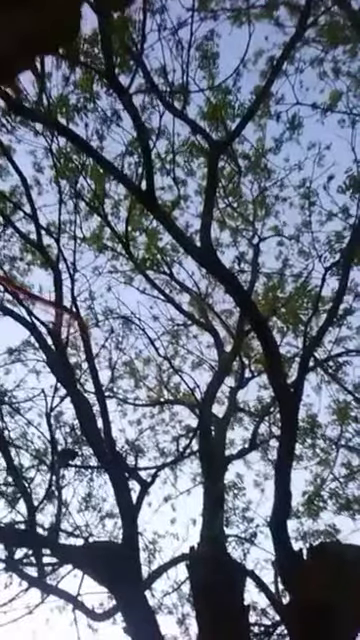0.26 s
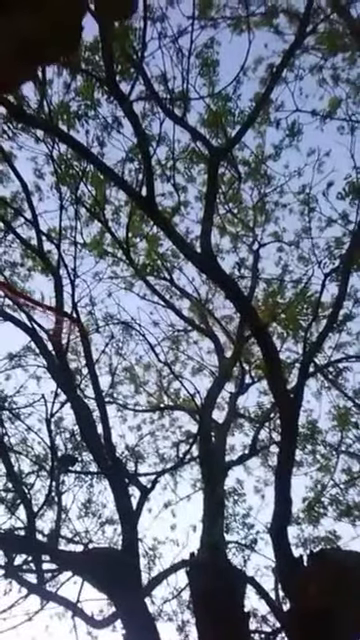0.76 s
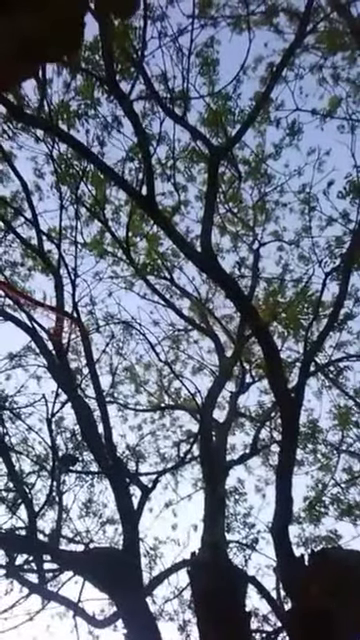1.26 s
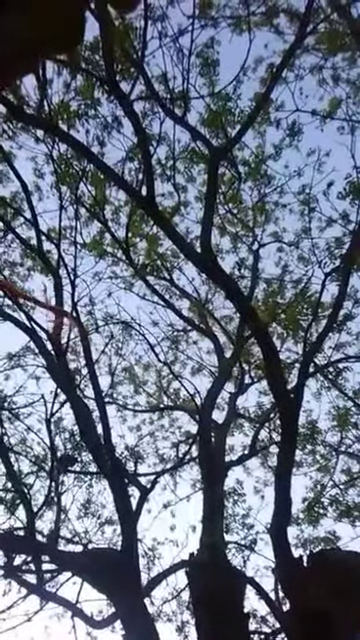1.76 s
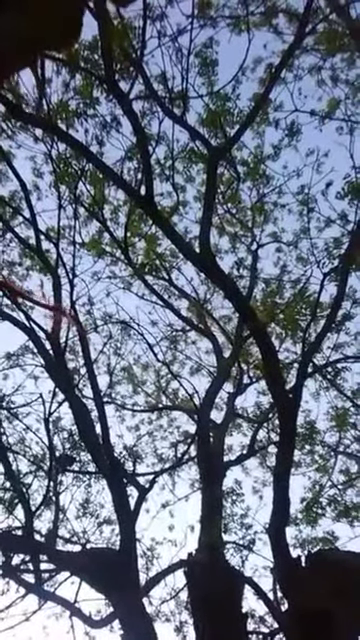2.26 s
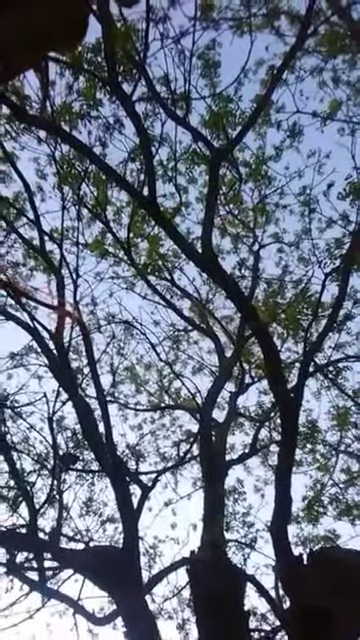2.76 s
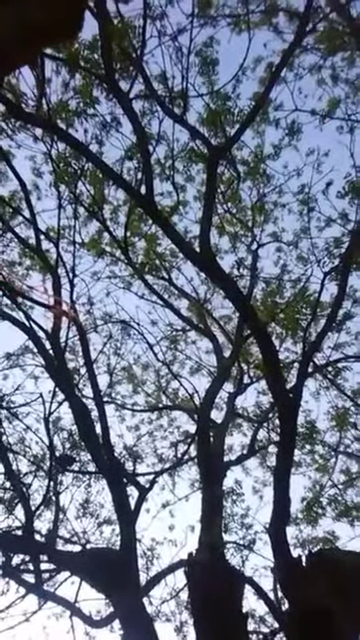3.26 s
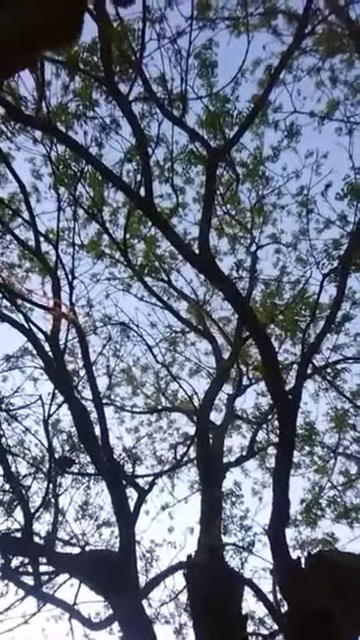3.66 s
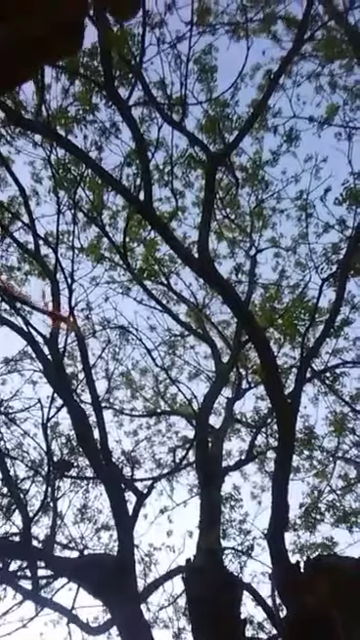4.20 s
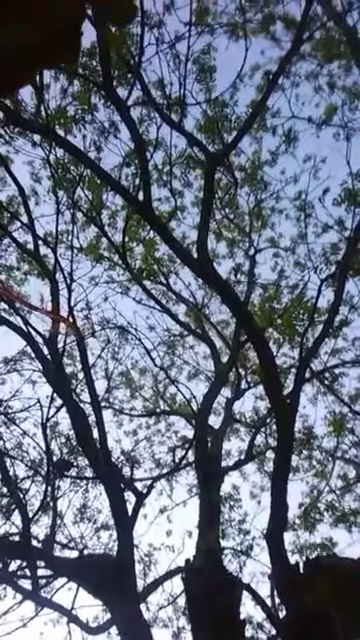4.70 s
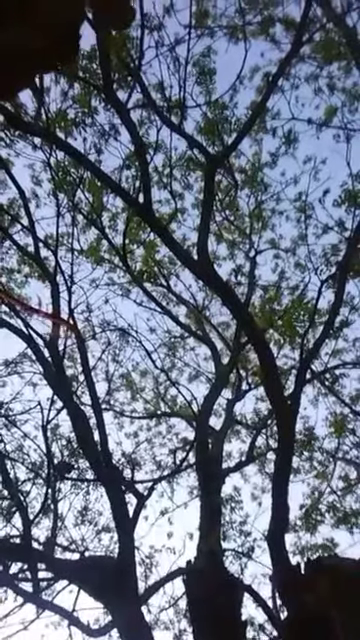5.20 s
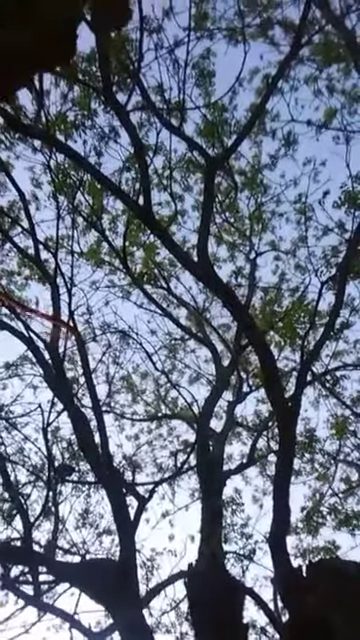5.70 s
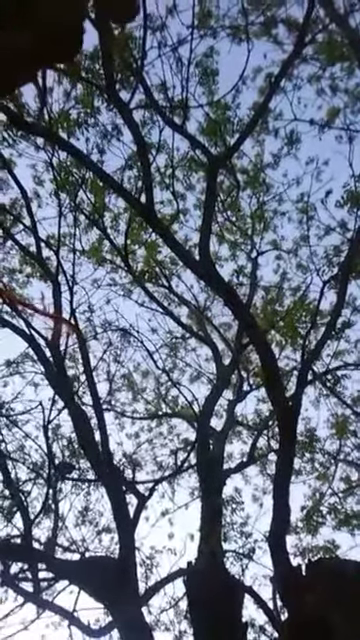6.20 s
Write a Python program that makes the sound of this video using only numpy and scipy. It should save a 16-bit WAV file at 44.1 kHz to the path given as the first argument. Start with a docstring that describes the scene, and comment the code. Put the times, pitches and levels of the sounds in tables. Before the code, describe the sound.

A soft dull knock with a brief rustle opens at 0.05 s over a quiet rush of outdoor air and the low, slightly wavering hum of an idling engine. From 0.13 s a mockingbird overhead sings: a bright upward whistle, a two-toned chord at 0.3, sharp chips at 0.65 and 0.9, thin high notes at 1.15 and 1.45. A quiet buzzy whine with fast flicks follows at 1.8-2.1, then four harsh chacks, each led by a tick, from 2.3 to 3.2. Two chups come at 3.4 and 3.6, a long descending slur at 3.9, two swoops leading into strong rising whistles at 4.5 and 5.0, rough churrs at 5.55 and 5.8, and faint piercing seeps at 6.1 and 6.4. Distant birds whistle, twitter and rasp hazily throughout. A far dog barks at 4.05 and 4.55, with lingering echo. Trees and walls scatter the song.

```python
"""A soft knock opens the scene, over a steady rush of air and the hum of an idling engine.
Then a mockingbird sings overhead to the end: whistles, chips, harsh chacks and slurs, most of them repeated.
Its two-sided voice box can sound two gliding tones at once; trunks and house walls scatter the song.
Far birds whistle, twitter and rasp meanwhile, as gliding tones, flickering noise and hazy falling calls.
After four seconds a dog barks twice far off: two bursts of noise with a long faint tail."""
import sys
import numpy as np
from scipy import signal
from scipy.fft import rfft, irfft, next_fast_len
from scipy.io import wavfile
from scipy.ndimage import map_coordinates

SR = 44100
rng = np.random.default_rng(int(sys.argv[2]) if len(sys.argv) > 2 else 0)


def generate_wav(sig):
    """Save sig (samples, or channels by samples) to the path in sys.argv[1] as 16-bit PCM at SR."""
    pcm = np.round(np.clip(np.atleast_2d(sig).T, -1, 1) * 32767).astype(np.int16)
    wavfile.write(sys.argv[1], SR, pcm)


N = 284445  # length of the scene in samples
MARGIN_S = .01  # room for a stroke to fade in and out
# Calls of the mockingbird and, named "rasp", of a far bird: t/s, syllable, level/dB, stretch in time (factor)
CALLS = [(0.134, "whee", -39, 1), (.308, "chord", -39.5, 0.97), (.639, "chip", -34, 0.91),
         (.911, "chip", -35.5, 1.05), (1.138, "tsee", -40, 1.006), (1.441, "tsee", -40.5, 1.02),
         (1.77, "whine", -50, 0.84), (1.801, "undertone", -54, 1.14), (1.882, "undertone", -52.5, 1.16),
         (1.935, "undertone", -60, .7), (1.974, "undertone", -54, 1.02), (1.768, "flick", -60, 0.79),
         (1.833, "flick", -50.5, 0.88), (1.917, "flick", -55, 0.93), (1.969, "flick", -54, 0.78),
         (2.047, "flick", -48, 1.3), (2.303, "tick", -51.5, .6), (2.333, "chack", -43.5, 0.9),
         (2.513, "tick", -50, 1.2), (2.568, "chack", -42, 0.92), (2.783, "tick", -48, 0.87),
         (2.828, "chack", -43, 0.94), (3.086, "tick", -48.5, 0.94), (3.133, "chack", -42.5, 0.87),
         (3.416, "chup", -44, 1.04), (3.632, "chup", -42.5, 1.2), (3.69, "rasp", -70, 0.97),
         (3.873, "slur", -37, 0.95), (4.467, "swoop", -44.5, 0.99), (4.618, "rise", -31.5, 1.026),
         (4.998, "swoop", -43.5, 1.01), (5.146, "rise", -32.5, 1.04), (5.545, "churr", -39.5, 0.98),
         (5.813, "churr", -41, 0.97), (5.885, "rasp", -64, 0.9), (6.086, "seet", -50.5, 1.08),
         (6.146, "rasp", -64.5, 1.1), (6.419, "seet", -50, 1)]


def amp(db):
    """Turn decibels into a gain."""
    return 10 ** (np.asarray(db) / 20)


def unit(x):
    """Scale x to an average strength (rms) of 1."""
    return x / np.sqrt(np.mean(x ** 2) + 1e-20)


def along(points, hz):
    """Read a curve of (f/Hz, value) points at the given frequencies, on a log axis."""
    f, v = np.transpose(points)
    return np.interp(np.log(hz + 1), np.log(f + 1), v)


def wobble(rate, size):
    """A smooth random curve through `rate` random points a second."""
    knots = rng.standard_normal(int(size * rate / SR) + 4)
    return map_coordinates(knots, [np.arange(size) * rate / SR])


def filtered(x, response):
    """Weigh each frequency of x by the response."""
    m = next_fast_len(len(x) + 8192)
    spectrum = rfft(x, m) * response(np.fft.rfftfreq(m, 1 / SR))
    return irfft(spectrum, m)[:len(x)]


def noise(colour, size=N):
    """Noise of rms 1 whose spectrum follows the colour's points."""
    return unit(filtered(rng.standard_normal(size), lambda hz: amp(along(colour, hz))))


def add(track, s, sound):
    """Mix a sound into the track at s seconds."""
    start = max(round(s * SR), 0)
    track[start:start + len(sound)] += sound[:max(N - start, 0)]


def mockingbird():
    """Sing the syllables at their times, some of them overlapping."""
    return sing([call for call in CALLS if call[1] != "rasp"])


def sing(calls, treble_early_db=-8):
    """Voice the calls; each kind has its own share of echo, as the head turns. Treble noise is all echo."""
    # The strokes of each syllable ("rasp" is the far bird's); times are those before stretching:
    # t/s after the syllable starts, length/s, start f/Hz, held f/Hz, end f/Hz,
    # sharpness of the bends, level/dB within the syllable, loudest point (share of the length)
    syllables = { "whee": [(.003, .03, 3870, 3820, 4380, 1.7, -1, .95),
                 (.03, 0.067, 4480, 4385, 4530, 5, 4.5, .25),
                 (.112, 0.057, 5050, 6150, 6080, 2.5, -1.5, 0.9),
                 (.163, 0.018, 6090, 4800, 3300, 2, -9, 0.5)],
                 "chord": [(0, .018, 8000, 4980, 3200, 2, -4, .5),
                 (.007, .1, 3256, 3765, 3180, 2.3, 3.5, 0.19), (.016, .125, 2540, 2670, 2640, 5, 0, .7)],
                 "chip": [(.008, .023, 2700, 2250, 2040, 2.03, -1.5, 0.42),
                 (.026, .024, 2840, 1998, 1720, 2.22, -7, 0.63)],
                 "tsee": [(0, 0.0083, 6850, 6450, 5900, 1.6, -10.5, .7),
                 (.007, .078, 6240, 7430, 7560, 11, -4, .25),
                 (.089, 0.0268, 7000, 7950, 7900, 2.57, 3, 0.2),
                 (.01, 0.067, 6200, 5950, 6100, 5.1, -13.5, 0), (.012, .04, 4440, 4480, 4460, 3, -26, .3),
                 (.015, .053, 2980, 3020, 2500, 7.3, -21, .6), (.066, 0.035, 3080, 3380, 3570, 2, -17, 0.6),
                 (.088, .022, 5640, 4210, 3480, 1.9, -16.5, .5)],
                 "whine": [(.008, .31, 2068, 2206, 2270, 3, -2, 0.1)],
                 "undertone": [(0, 0.039, 1520, 1500, 1482, 1.6, 0, 0.7)],
                 "flick": [(0.00049, .016, 3100, 2900, 940, 1.92, -5, .5)],
                 "tick": [(-.004, .048, 3500, 3836, 2080, 3, 0, 0.9),
                 (-.002, .036, 5200, 7700, 6150, 3, -9, 0.6)],
                 "chack": [(0.0003, 0.014, 8300, 5600, 3400, 1.05, -1.5, 0.4),
                 (.012, 0.0217, 4500, 3900, 3500, 1.96, 2.5, .5),
                 (.026, 0.0181, 2700, 2250, 2200, 1.95, -1, .5), (.01, .022, 7700, 6900, 4600, 2, 1, 0),
                 (0.008, .02, 1930, 1920, 2070, 2, -14, .7)],
                 "chup": [(0, 0.0235, 1950, 2200, 2300, 1.8, -1.5, 0.9),
                 (.023, 0.0266, 2600, 2050, 2200, 2.55, 5.5, 0.3),
                 (.018, 0.027, 1600, 2700, 1420, 1.6, -6.5, 0.3),
                 (0.005, 0.0427, 1800, 2900, 4800, 1.98, -17.5, 0.47)],
                 "slur": [(0, .115, 2230, 2550, 2565, 2, -2, 0.34),
                 (.11, 0.0613, 2560, 2530, 2400, 2.2, -1.5, 0.8),
                 (.168, .1, 2400, 2300, 2120, 2.2, 3.5, 0.48),
                 (.042, .135, 2000, 2020, 1960, 2.8, -5, 0.15),
                 (.235, .17, 1800, 1430, 1440, 2.5, -2.5, .5)],
                 "swoop": [(0, .102, 2990, 3040, 3050, 4, -4.5, .65),
                 (.092, .035, 3020, 2720, 1950, 2.1, 6, .45)],
                 "rise": [(0.0039, .22, 1680, 2115, 2190, 4, 4, 0.48)],
                 "churr": [(0, 0.0227, 2800, 2200, 1600, 2.3, -12.5, 0.7),
                 (.022, 0.05, 2400, 2050, 1700, 3.15, 1.5, 0.37),
                 (0.028, 0.034, 2400, 3250, 2450, 2.5, -3.5, .55),
                 (0, 0.02, 1400, 1640, 1620, 1.7, -14, 0.9)],
                 "seet": [(0.00023, .068, 8800, 7050, 8300, 6.2, 1, 0.69)],
                 "rasp": [(0, .08, 5600, 3300, 2500, 3, 0, 0.46)]}
    # The voice of each syllable ("rasp" is the far bird's): swell/dB, second harmonic/dB, third harmonic/dB,
    # hiss/dB, treble noise/dB, roughness (factor), buzz/Hz, echo/dB
    voices = { "whee": (15, -32, -24, -37, -35, 0.2, 0.5, -2),
              "chord": (6, -12, -29.5, -20, -27, 0.14, -0.5, -2.5),
              "chip": (13.5, -13, -44, -18, -27, 0.33, -0.5, 0),
              "tsee": (10, -39, -50, -20.5, -17, 0.48, 0, -7),
              "whine": (2.5, -35, -48, -34, -46, 0.13, 370, 3),
              "undertone": (8, -17, -34, -21, -49, 0.04, -2, 0),
              "flick": (9, -18, -38, -31, -40, .6, -3, 1.5),
              "tick": (15.5, -26, -26, -7.5, -29, 0.96, 0, 1.5),
              "chack": (5.5, -23, -24, -14.5, -22.5, .5, 0, 0.5),
              "chup": (11.5, -22.5, -38, -31.5, -42, 0.62, -0.5, -0.5),
              "slur": (11.5, -32.5, -44, -33.5, -45, 0.05, 1.5, -3.5),
              "swoop": (9, -34, -23.5, -30.5, -39, 0.1347, 125.5, 2.5),
              "rise": (19.5, -48.5, -42, -43.5, -58, -0.0034, 35, -3),
              "churr": (13.5, -16, -20, -19, -31, 0.31, -0.5, 1),
              "seet": (13, -40, -53, -23, -3.5, .06, -4, -2.5),
              "rasp": (15.5, -22, -29, -11.5, -19, 0.83, 1, 8)}
    # Colour of the calls as they reach the ground: f/Hz, level/dB
    call_colour = [(1050, -15), (1450, -1.5), (3200, -1), (4600, 0), (6000, 0.5), (7900, -2.5), (8700, -4),
                   (11500, -12), (14000, -9)]
    track = np.zeros(N)
    for s, name, db, stretch in calls:
        *voice, echo_db = voices[name]
        call, treble_noise = syrinx(syllables[name], stretch, *voice)
        add(track, s - MARGIN_S, amp(db) * call)
        add(track, s - MARGIN_S, amp(db + echo_db) * yard(call))
        add(track, s - MARGIN_S, amp(db) * yard(treble_noise, early_db=treble_early_db))
    return filtered(track, lambda hz: amp(along(call_colour, hz)))


def syrinx(strokes, stretch, swell_db, second_db, third_db, hiss_db, treble_noise_db, roughness, buzz_hz):
    """The voice box: tones sounding together shape each other into overtones, sum tones and side bands."""
    # Colour of the hiss in the voice: f/Hz, relative level/dB
    hiss_colour = [(1300, -27), (2200, -8), (3200, 4.5), (4500, -2), (5600, 5), (7500, -4), (11500, -2),
                   (14000, -23)]
    # Colour of the faint treble noise that follows the calls: f/Hz, relative level/dB
    treble_colour = [(6000, -33), (8800, -7), (9800, 3), (11800, 2.5), (12600, -5.5), (13900, -7.5)]
    warble_hz = 50  # how far the buzz pulls the pitch
    coupling_db = -16  # strength of the side bands
    fourth_db = -4.5  # fourth harmonic against the third
    end_s = stretch * max(s + length for s, length, *_ in strokes)
    t = np.arange(-MARGIN_S, end_s + MARGIN_S, 1 / SR)

    # a flutter of the membranes shakes pitch and strength: a warble when slow, a buzz when fast
    buzz = np.sin(2 * np.pi * buzz_hz * t)
    parts = [stroke(row, t / stretch, swell_db, roughness, warble_hz * buzz) for row in strokes]
    tones, levels, pitches = map(np.array, zip(*parts))
    tone = tones.sum(axis=0)
    level = levels.sum(axis=0) + 1e-12
    shape = tone / level
    pitch = (levels * pitches).sum(axis=0) / level  # average, louder tones count more

    # powers of the joint tone give its overtones; those too high for the sample rate are left out
    overtones = 0
    for k, db in enumerate([second_db, third_db, third_db + fourth_db], 2):
        overtones = overtones + amp(db) * shape ** (k - 1) * (k * pitch < SR / 2)
    sidebands = amp(coupling_db) * (np.abs(shape) ** 2 - 1)
    voiced = np.real(tone * (1 + overtones + sidebands))

    # turbulence in the air stream grows with the tone
    hiss = amp(hiss_db) * level * noise(hiss_colour, len(t))
    treble_noise = amp(treble_noise_db) * level * noise(treble_colour, len(t))
    depth = .42 * abs(buzz_hz / 100) ** .4  # in log strength: faster flutters bite deeper
    return np.exp(depth * buzz) * (voiced + hiss), treble_noise


def stroke(row, t, swell_db, roughness, warble=0, fade_s=0.0015):
    """One gliding tone as a turning pointer, with its level and pitch; roughness shakes both."""
    shake_rate_hz, swing_hz, flutter = 1300, 520, .45  # shaking: speed, reach in pitch, in log strength
    waver_hz, waver_rate_hz = 14, 90  # reach and speed of a held note's unsteadiness
    s, length, start_hz, held_hz, end_hz, sharpness, db, crest = row
    u = np.clip((t - s) / length, 0, 1)

    # scoop from the start pitch towards the held one, then bend away to the end pitch
    scoop = (start_hz - held_hz) * (1 - u) ** sharpness
    bend = (end_hz - held_hz) * u ** sharpness
    shake = swing_hz * roughness * wobble(shake_rate_hz, len(t))
    waver = waver_hz * wobble(waver_rate_hz, len(t))
    pitch = held_hz + scoop + bend + warble + shake + waver

    # the note swells to its loudest point, sinks again and is cut off at both ends
    off_crest = np.interp(u, [0, np.clip(crest, .01, .99), 1], [1, 0, 1])
    outside = np.maximum(s - t, 0) + np.maximum(t - s - length, 0)
    level = amp(db - swell_db * off_crest ** 2) * np.exp(-(outside / fade_s) ** 2)
    level = level * np.exp(flutter * roughness * wobble(shake_rate_hz / 2, len(t)))
    return level * np.exp(2j * np.pi * np.cumsum(pitch) / SR), level, pitch


def yard(x, early_db=3, early_t60=0.22, gap_s=0.002):
    """Trunks and near walls scatter a quick dense echo; the yard adds a longer tail."""
    # How long the yard rings: f/Hz, time to fall by 60 dB/s
    ring_times = [(500, 0.08), (2000, 0.33), (5000, 0.45), (8000, 0.33), (13000, 1)]
    hz, t, z = signal.stft(rng.standard_normal(SR // 2), SR, nperseg=256)
    late = amp(-60 * t / along(ring_times, hz)[:, None])
    early = amp(early_db - 60 * t / early_t60)
    tail = signal.istft(z * (late + early), SR, nperseg=256)[1]
    # the echo sets in softly, just after the direct sound
    tail = tail * (1 - np.exp(-(np.arange(len(tail)) / SR / gap_s) ** 2))
    return signal.fftconvolve(x, tail / np.linalg.norm(tail))


def far_rasp():
    """A far bird's hazy falling rasp, heard mostly as echo."""
    return sing([call for call in CALLS if call[1] == "rasp"])


def far_birds(whistle_db=-2, direct=0.53, twitter_db=-3, flicker_db=3):
    """Distant whistles arrive mostly as echo, with bouts of high twittering noise that swell and fade."""
    # Whistles, one stroke each: t/s, length/s, start f/Hz, held f/Hz, end f/Hz,
    # sharpness of the bends, relative level/dB, loudest point (share of the length)
    whistle_strokes = [(0.122, 0.19, 2336, 2638, 2587, 3.02, -55.5, 0.46),
                       (0.706, 0.095, 1959, 2280, 2470, 1.85, -54.5, 0),
                       (0.838, 0.3, 2620, 2780, 2560, 4, -57, 0.9),
                       (1.596, 0.12, 1940, 2140, 2194, 2.7, -65.5, 0.2),
                       (2.421, 0.12, 1760, 1653, 2006, 3.8, -55.5, 1),
                       (3.169, 0.18, 2190, 2103, 2038, 2, -55, 0.6),
                       (3.21, 0.102, 2380, 2325, 2310, 2.2, -58, .6),
                       (4.423, .09, 2390, 2064, 2260, 2.8, -52, 0.7),
                       (4.892, 0.078, 2493, 2415, 2100, 1.97, -54, 0.4),
                       (5.41, 0.12, 2510, 2660, 2620, 2, -58, 0.1)]
    # Bouts of twittering: t/s of the peak, length/s, relative level/dB
    twitter_bouts = [(.2, 0.85, -70), (0.654, 0.22, -63.5), (2.81, .1, -63.5), (3.294, 0.6, -71.5),
                     (4.1, 0.37, -62.5), (4.75, 0.41, -74), (5.257, 0.41, -67), (5.72, .12, -70),
                     (5.985, 0.18, -77.5)]
    # Colour of the twittering: f/Hz, relative level/dB
    twitter_colour = [(3500, -15), (4700, -22.5), (5200, 4.5), (5500, -12.5), (5900, 0), (6700, -33),
                      (8000, -40)]
    whistles = np.zeros(N)
    for row in whistle_strokes:
        s, length = row[:2]
        t = np.arange(s - MARGIN_S, s + length + MARGIN_S, 1 / SR)
        tone = stroke(row, t, swell_db=5, roughness=.14)[0]
        add(whistles, t[0], tone.real)
    bouts = np.zeros(N)
    for s, length, db in twitter_bouts:
        bouts += amp(db) * np.exp(-(2 * (np.arange(N) / SR - s) / length) ** 2)
    flicker = amp(twitter_db + flicker_db * wobble(25, N))
    twitter = bouts * flicker * noise(twitter_colour)
    return amp(whistle_db) * (direct * whistles + yard(whistles)[:N]) + twitter


def dog(rise_s=0.039, t60=0.43, street_db=-17, street_t60=3.7):
    """Two hoarse barks of noise, smeared by the distance, linger faintly down the street."""
    # The barks: t/s, length/s, level/dB
    barks = [(4.043, 0.19, -48.5), (4.546, 0.15, -47)]
    # Colour of the barks: f/Hz, relative level/dB
    bark_colour = [(500, -27.5), (660, -13.5), (790, -3), (1030, -0.5), (1300, -11), (1700, -6.5),
                   (2200, 0.5), (2700, -42), (4500, -57)]
    level = np.zeros(N)
    for s, length, db in barks:
        t = np.maximum(np.arange(N) / SR - s, 0)
        after = np.maximum(t - length, 0)
        fade = amp(-60 * after / t60) + amp(street_db - 60 * after / street_t60)
        level += amp(db) * (1 - np.exp(-(t / rise_s) ** 2)) * fade
    return level * noise(bark_colour)


def bump(start_s=.045, thud_db=-35, thud_hz=125, thud_t60=0.058, rustle_db=-50, rustle_t60=0.4):
    """A soft knock, a low tone that dies quickly, with a short rustle of fading noise."""
    # Colour of the rustle: f/Hz, relative level/dB
    rustle_colour = [(30, -2.5), (130, -7.5), (300, -15), (800, -23.5), (2000, -24.5), (6000, -31),
                     (14000, -41)]
    t = np.maximum(np.arange(N) / SR - start_s, 0)
    thud = amp(thud_db - 60 * t / thud_t60) * np.sin(2 * np.pi * thud_hz * t)
    rustle = (t > 0) * amp(rustle_db - 60 * t / rustle_t60) * noise(rustle_colour)
    return thud + rustle


def engine(cycle_hz=8.335, hum_db=1, drift=0.0016, waver_db=-1.2, rumble_db=-69):
    """An idling engine: its tones are multiples of one slightly unsteady cycle, over a soft rumble."""
    # Tones of the hum: multiple of the engine's cycle rate, relative level/dB
    hum_tones = [(6, -76.5), (9, -75), (11, -72.5), (12, -66), (13, -77), (15, -63.5), (19, -71),
                 (21, -72.5), (22, -70.5), (27, -76.5), (28, -85.5)]
    turns = cycle_hz * np.cumsum(1 + drift * wobble(1.5, N)) / SR
    hum = np.zeros(N)
    for k, db in hum_tones:
        level = amp(db + waver_db * wobble(0.92, N))
        hum += level * np.sin(2 * np.pi * (round(k) * turns + rng.random()))
    rumble = noise([(30, -24.0), (70, 4.5), (110, -11.5), (185, -2.0), (260, -19.5), (500, -42)])
    return amp(hum_db) * np.sqrt(2) * hum + amp(rumble_db) * rumble


def outdoor_air(air_db=-69, swell_db=1.5, traffic_db=-80, traffic_swell_db=4, approach_db_per_s=1):
    """A far-off rush of noise, with a low traffic band that comes and goes and slowly gains."""
    # Colour of the rush: f/Hz, relative level/dB
    air_colour = [(20, 1), (90, 8.5), (280, 4), (370, 1), (480, 0), (700, -1.5), (1000, -4.5), (1400, -7.5),
                  (2200, -3.5), (3500, -15.5), (6000, -15), (9000, -20), (14000, -32.5)]
    rush = amp(air_db + swell_db * wobble(2.7, N)) * noise(air_colour)
    from_middle_s = (np.arange(N) - N / 2) / SR
    level_db = traffic_db + approach_db_per_s * from_middle_s + traffic_swell_db * wobble(26, N)
    band = noise([(300, -36), (470, 6.5), (620, -5.5), (1000, -12.5), (1500, -30)])
    return rush + amp(level_db) * band


def scene():
    """Everything as heard from under the tree, in one channel."""
    birds = mockingbird() + far_rasp() + far_birds()
    return (birds + dog() + bump() + engine() + outdoor_air())[None]


def record(dry, top_hz=13950):
    """Keep nothing from the top frequency upwards."""
    return np.array([filtered(channel, lambda hz: hz < top_hz) for channel in dry])


dry = scene()
out = record(dry)
generate_wav(out)
```